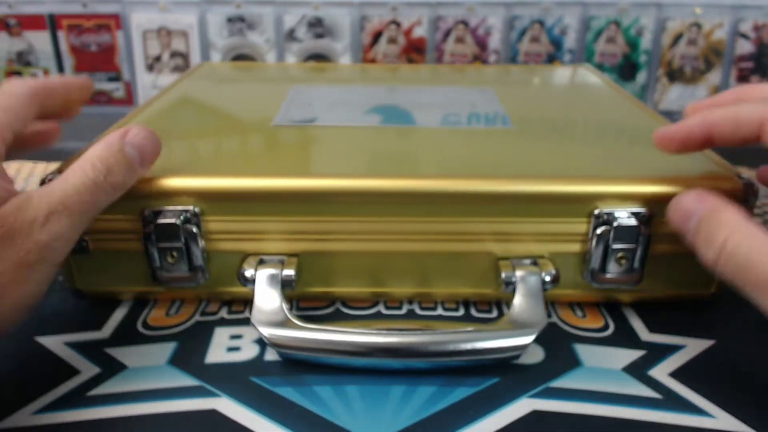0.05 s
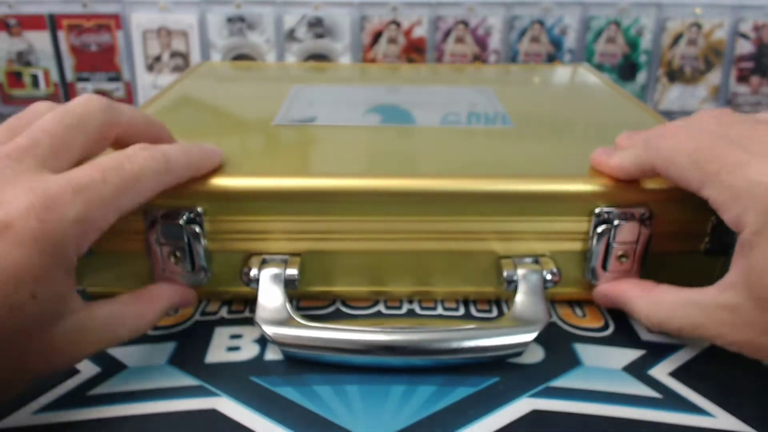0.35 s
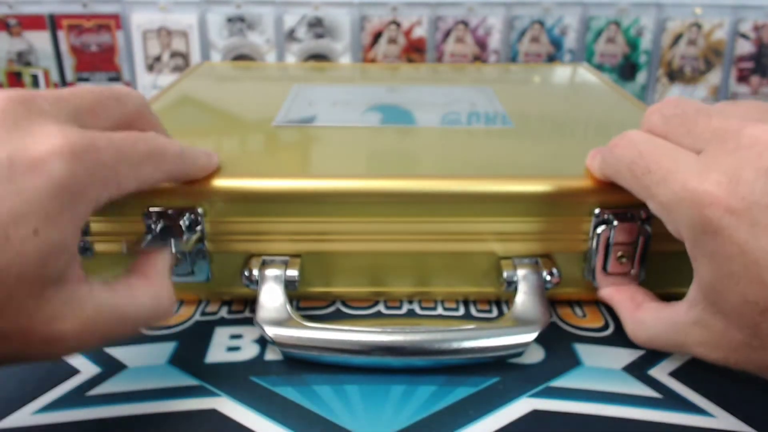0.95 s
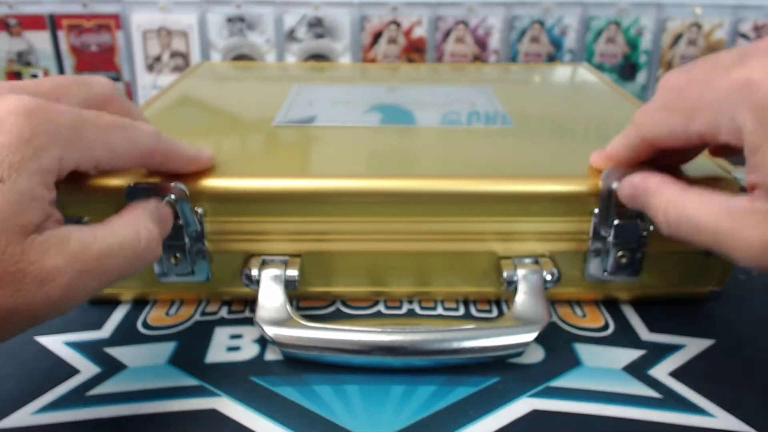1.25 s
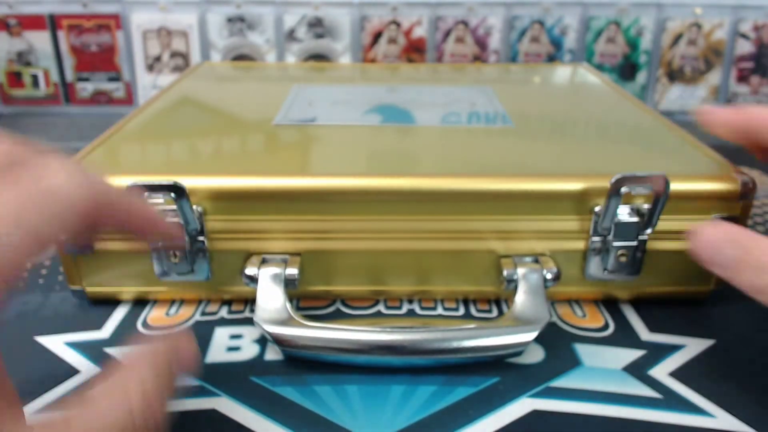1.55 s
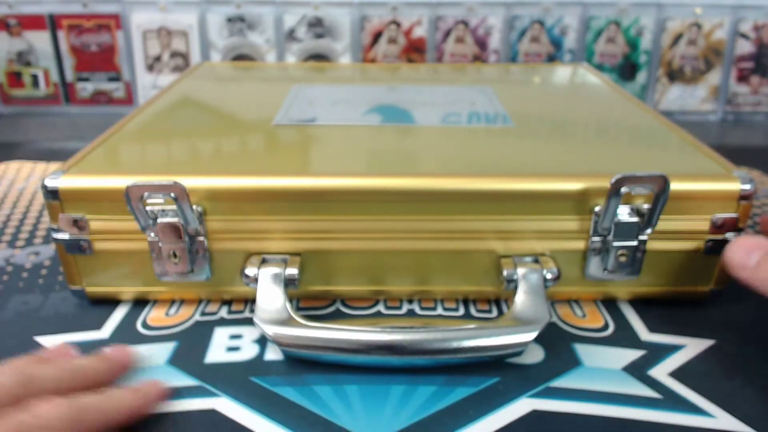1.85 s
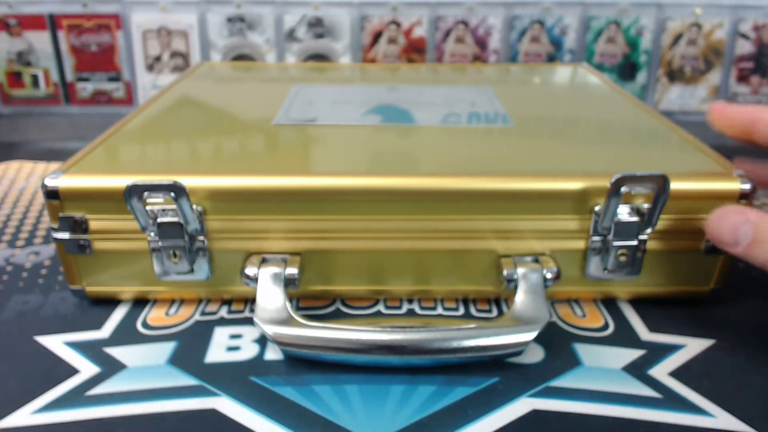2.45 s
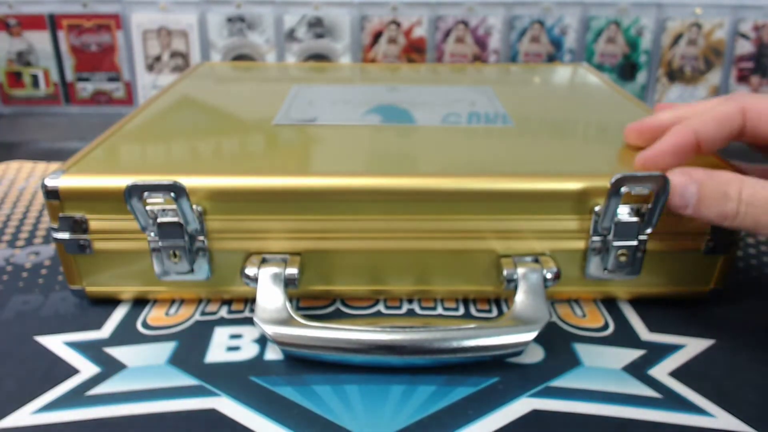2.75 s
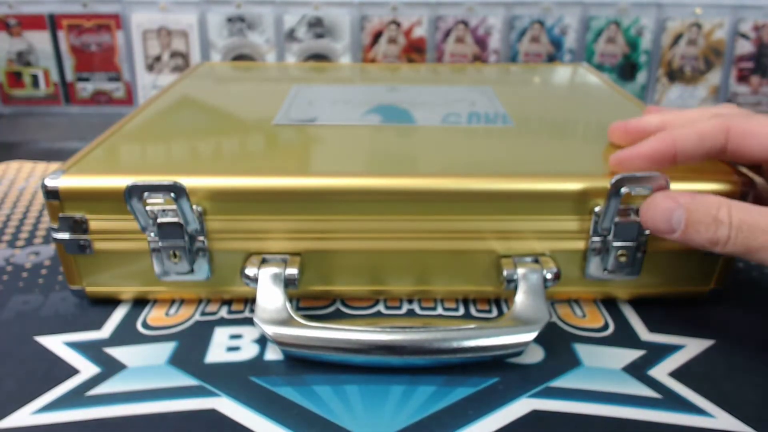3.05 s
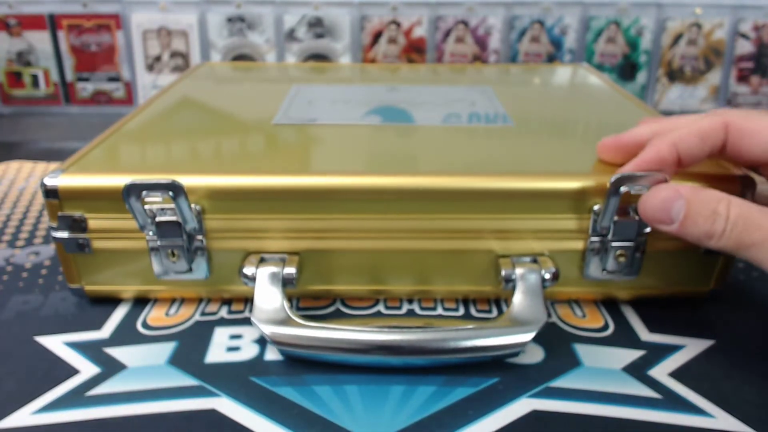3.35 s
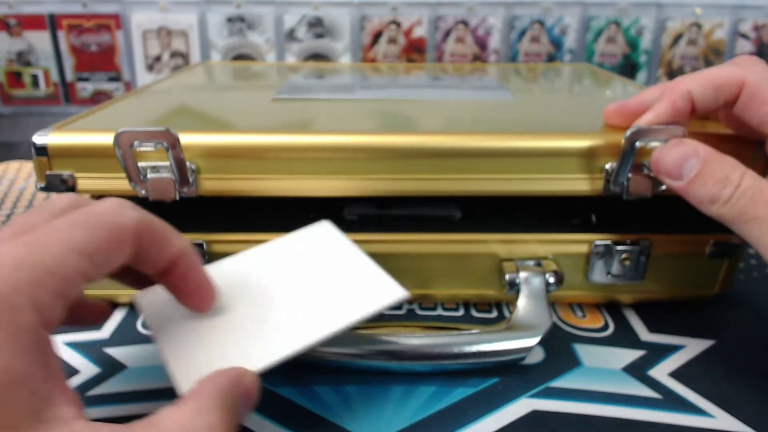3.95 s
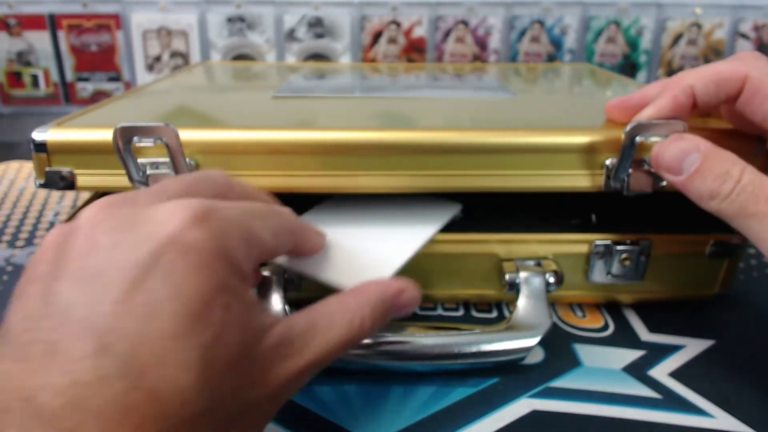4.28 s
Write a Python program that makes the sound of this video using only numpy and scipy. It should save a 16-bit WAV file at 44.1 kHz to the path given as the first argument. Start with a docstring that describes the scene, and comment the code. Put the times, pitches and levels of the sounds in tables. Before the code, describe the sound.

Hands unfasten a small aluminium case with light clicks and hollow knocks, lift the lid and slip in a softly rasping card.

```python
"""Hands brush over a small aluminium case and bump the padded desk, which sways under it.
Two steel latches are thumbed open close by: each hasp judders by stick and slip, then lets go,
and the impacts excite the damped modes of the steel, the panels and the hollow shell.
After more brushing the lid scrapes free of its rim, and last a card rasps in at the opening.
Throughout, the walls of a small, quiet room reflect the sound over faint air noise and hum."""
import sys
import numpy as np
from scipy import signal
from scipy.fft import rfft, irfft, next_fast_len
from scipy.io import wavfile
from scipy.ndimage import uniform_filter1d

SR = 44100
rng = np.random.default_rng(int(sys.argv[2]) if len(sys.argv) > 2 else 0)


def persist_wave(psi):
    """Save psi, clipped to +-1, as 16-bit WAV."""
    counts = np.round(np.clip(psi, -1, 1) * 32767).astype(np.int16)
    wavfile.write(sys.argv[1], SR, np.atleast_2d(counts).T)


N = 190240
TIME = np.arange(N) / SR
AGE = TIME[:8192]  # time since an impact, t/s


# Timbre by struck part: shell f/Hz, favoured panel f/Hz, click low f/Hz, click high f/Hz,
# favoured steel f/Hz, then resonance level/dB, ring level/dB, edge level/dB relative to the click
PARTS = {'wall': (199, 1256, 1998, 7400, 2301, -12, -5, -9.5),
         'first latch': (253, 1350, 1698, 7397, 2502, -8, -11, -30),
         'second latch': (211, 848, 2098, 7600, 3503, -4.5, -10, -18.5),
         'loose hasp': (210, 1257, 3785, 7605, 6792, -3, -11, -9),
         'hasp spring': (218, 620, 2000, 7400, 7000, -8, -12, 4),
         'rim': (308, 689, 2000, 7400, 2403, -5, 1, -11), 'lid': (297, 651, 2000, 7400, 2354, 11, 9, -29),
         'panel': (275.5, 651, 2000, 7400, 5189, -4, -13, -14),
         'frame': (263, 1206, 1004, 3000, 2298, 3, -9, -30),
         'fingertip': (216, 714, 452, 1702, 1294, 5, -19, -24),
         'card': (349, 1248, 1500, 7400, 6700, 0, -14, -17)}
# Impacts on the case: t/s, part, steel level/dB, panel level/dB, shell level/dB
IMPACTS = [(.094, 'wall', -64, -69, -53.5), (.1647, 'wall', -53, -59.5, -54),
           (0.1762, 'wall', -68, -63, -51), (.203, 'wall', -80, -77, -54.5),
           (0.335, 'panel', -68, -63.5, -70), (.369, 'panel', -58.5, -59.5, -84),
           (.742, 'second latch', -62, -61, -66), (.771, 'first latch', -43, -49, -48.5),
           (0.801, 'first latch', -62, -55.5, -58.5), (0.8069, 'first latch', -54, -53, -44.5),
           (.919, 'first latch', -71, -68, -58), (0.9444, 'panel', -59, -54, -48.5),
           (1.0023, 'second latch', -50.5, -52, -61), (1.0136, 'second latch', -52, -59, -46),
           (1.019, 'panel', -57, -51.5, -44.5), (1.0517, 'second latch', -43, -48.5, -39.5),
           (1.1125, 'second latch', -59, -59, -58), (1.127, 'second latch', -63, -62, -65),
           (1.1702, 'second latch', -51, -56, -76), (1.178, 'second latch', -53, -55.5, -43.5),
           (1.203, 'second latch', -62, -62.5, -68), (1.288, 'second latch', -72, -67, -64.5),
           (1.314, 'loose hasp', -66, -68, -61.5), (1.393, 'wall', -64.5, -75, -71),
           (1.416, 'hasp spring', -77, -89, -81), (1.445, 'fingertip', -67, -61.5, -63.5),
           (1.5396, 'second latch', -51.5, -73, -57), (1.5434, 'loose hasp', -50.5, -72, -58),
           (1.557, 'fingertip', -76, -71, -51.5), (1.6479, 'frame', -61.5, -62.5, -67),
           (1.659, 'frame', -64.5, -65, -66), (2.085, 'hasp spring', -70, -89, -98),
           (2.412, 'fingertip', -68, -64.5, -78), (2.64, 'fingertip', -72, -66, -68),
           (3.18, 'loose hasp', -68, -82, -81), (3.339, 'loose hasp', -45, -59, -71),
           (3.3483, 'second latch', -54, -74, -74), (3.48, 'loose hasp', -54.5, -70, -93),
           (3.637, 'rim', -50.5, -65, -78), (3.6489, 'rim', -56.5, -61, -66), (3.652, 'rim', -60, -70, -73),
           (3.6598, 'panel', -62, -59, -71), (3.7183, 'lid', -53.5, -58.5, -56),
           (3.7235, 'panel', -65, -64, -48), (3.7326, 'panel', -57, -57.5, -64),
           (4.1186, 'card', -59, -65, -61), (4.1274, 'card', -58, -61, -62),
           (4.2224, 'frame', -57, -60, -70), (4.2627, 'card', -52, -56, -63.5)]
def latches():
    """Impact excitation: each contact of latch, lid or case drives steel, panels and shell at once."""
    out = np.zeros(N)
    rebound_s, rebound_db = 0.0027, -18  # the steel bounces once
    for t, part, steel_db, panel_db, shell_db in IMPACTS:
        shell_hz, panel_hz, low_hz, high_hz, *steel_timbre = PARTS[part]
        steel = undb(steel_db) * steel_click(part, low_hz, high_hz, *steel_timbre)
        panel = undb(panel_db) * panel_ring(panel_hz)
        shell = undb(shell_db) * shell_knock(shell_hz)
        add(out, t, steel + panel + shell)
        rebound = crack(low_hz, high_hz, t60=0.016, rise_s=0.0011)
        add(out, t + rebound_s, undb(steel_db + rebound_db) * rebound)
    return out


# Modes of the steel hasps and catches: f/Hz, relative level/dB, T60/s
STEEL_MODES = [(2570, -3, 0.024), (3530, -4, 0.02), (4340, -8, 0.013), (4780, -9, 0.018),
               (5460, -3, 0.0065), (6630, 1, 0.0083), (8300, -12, 0.0057)]
# Modes of the lid's rim: f/Hz, relative level/dB, T60/s
RIM_MODES = [(2410, 3, 0.03), (3500, -7, 0.028), (5800, -16, 0.012), (7300, 0, 0.012), (9140, 1, 0.013)]
def steel_click(part, low_hz, high_hz, spot_hz, resonance_db, ring_db, edge_db):
    """A short contact has a wide spectrum: a crack, a broad resonance, ringing metal and a high tick."""
    modes = RIM_MODES if part in ('rim', 'lid') else STEEL_MODES
    click = crack(low_hz, high_hz, t60=0.027, rise_s=0.000077)
    click += undb(resonance_db) * crack(spot_hz / 1.094, spot_hz * 1.075, t60=0.012, rise_s=0.000075)
    click += undb(ring_db) * ring(modes, spot_hz, spot_db=3, detune=0.012)
    edge = crack(9300, 13600, t60=0.016, rise_s=0.0001)
    return click / np.abs(click).max() + undb(edge_db) * edge


# Modes of the aluminium panels: f/Hz, relative level/dB, T60/s
PANEL_MODES = [(460, -1.5, 0.034), (546, 0.5, 0.055), (668, 2, 0.03), (806, -1, 0.031), (870, -6.5, 0.025),
               (991, 0, 0.034), (1210, -2, 0.025), (1368, -5, 0.022), (1450, 1.5, 0.016), (1800, -7, 0.033)]
def panel_ring(spot_hz):
    """Free vibration of plates: the struck panels ring in their bending modes over a midrange crack."""
    bending = ring(PANEL_MODES, spot_hz, spot_db=5.5, detune=0.0035)
    return unit_peak(bending + undb(-7.5) * crack(590, 1410, t60=0.025, rise_s=0.00017))


def shell_knock(hz):
    """Damped resonance of the hollow shell: the knock dies fast and a faint boom lingers."""
    decay = fade(t60=0.04) + undb(-20.5) * fade(t60=0.14)
    attack = 1 - np.exp(-AGE / 0.002)
    tone = np.sin(2 * np.pi * hz * AGE) * decay * attack
    return unit_peak(tone + undb(-17) * crack(209, 490, t60=0.034, rise_s=0.00042))


# Judders of a hasp over its catch: start t/s, duration/s, f/Hz, level/dB
SQUEAKS = [(0.733, 0.0049, 620, -59.5), (0.7676, 0.0045, 870, -47.5), (0.8, 0.0089, 847, -56.5),
           (0.989, 0.015, 965, -54.5), (1.041, 0.0088, 981, -50), (1.169, 0.0122, 976, -49.5)]
def squeaks():
    """Stick-slip oscillation: an uneven tone grows on a panel resonance and dies once the hasp is free."""
    out = np.zeros(N)
    for start, length, hz, db in SQUEAKS:
        grip = np.minimum(AGE / length, 1) * np.exp(-np.maximum(AGE - length, 0) / 0.0019)
        uneven = 1 + 0.13 * walk(700)[:len(AGE)]
        phase = 2 * np.pi * np.cumsum(hz * uneven) / SR
        tone = np.sin(phase) + undb(-22) * np.sin(2 * phase)
        add(out, start, undb(db) * unit_peak(grip * tone))
    return out


# Modes of desk and case under a soft blow: f/Hz, relative level/dB, T60/s
DESK_MODES = [(71, -2, .12), (104, 0, 0.08), (205, -12, 0.06)]
# Soft blows of the hands: t/s, sway f/Hz, sway level/dB, thud level/dB, rocking level/dB
THUDS = [(0.139, 38.8, -40.5, -52.5, -54), (1.214, 40.4, -42, -72, -63), (1.511, 37.1, -55, -46.5, -64),
         (1.566, 36.1, -32, -41, -29), (1.624, 30.2, -55, -50.5, -59), (3.694, 42.5, -48.5, -55, -55)]
def thuds():
    """A soft contact excites only low modes: the desk sways, then thuds and rocks as the hand settles."""
    out = np.zeros(N)
    settle_s = 0.03227
    thud = sum(undb(db) * swing(hz, t60) for hz, db, t60 in DESK_MODES)
    for t, sway_hz, sway_db, thud_db, rock_db in THUDS:
        add(out, t, undb(sway_db) * swing(sway_hz, t60=0.27))
        add(out, t + settle_s, undb(thud_db) * thud + undb(rock_db) * swing(hz=17.5, t60=1.0))
    return out


# Envelope of the card's pushes: t/s, level/dB
CARD_PUSHES = [(4.125, -65), (4.19, -64.5), (4.217, -68), (4.226, -61.5), (4.256, -62), (4.263, -60.5),
               (4.288, -58.5), (4.31, -64.5)]
# Spectrum of its rasp: f/Hz, relative level/dB
CARD_SPECTRUM = [(150, -28), (330, -11), (600, -9), (950, -3), (1350, -0.5), (2300, -3.5), (4400, -6.5),
                 (8000, -9.5), (15500, -18)]
# Its resonances: f/Hz, bandwidth/Hz, relative level/dB, strongest at t/s
CARD_RESONANCES = [(3130, 300, 1, 4.18), (5240, 320, 11, 4.135), (6900, 390, 10, 4.125),
                   (1322, 160, 10, 4.237), (2210, 330, 11, 4.285), (3600, 210, 15, 4.297),
                   (4480, 180, 10, 4.242), (5570, 150, 7, 4.255), (6230, 140, 6, 4.28),
                   (7700, 200, 8, 4.28)]
def card():
    """Friction drives the card's resonances, which swell and fade in turn as its free length changes."""
    start_s, attack_s, swell_s = 4.115, 0.023, 0.034
    slips = friction(grain_db=4) * undb(3 * walk(450))
    resonances = 0
    for hz, width, db, strongest_s in CARD_RESONANCES:
        flexed_time = TIME + 0.0001 * walk(30)  # a wandering delay makes the pitch waver
        resonance = np.interp(flexed_time, TIME, band(slips, hz - width / 2, hz + width / 2))
        prominence = np.exp(-((TIME - strongest_s) / swell_s) ** 2)
        resonances += undb(db) * prominence * resonance
    echo_time = TIME - 0.00127 + 0.00005 * walk(20)  # reflection in the gap under the lid
    echo = undb(-18) * np.interp(echo_time, TIME, slips)
    rasp = colour(slips + resonances + echo, CARD_SPECTRUM)
    rasp /= np.sqrt(uniform_filter1d(rasp ** 2, size=2048))  # running rms held at 1
    pushes = undb(np.interp(TIME, *np.transpose(CARD_PUSHES)))
    return rasp * pushes * np.clip((TIME - start_s) / attack_s, 0, 1)


# Rough drags of the hands and of the lid on its rim: start t/s, duration/s, level/dB, centre f/Hz
DRAGS = [(1.265, 0.03, -86, 2860), (1.367, 0.038, -81, 2900), (1.84, 0.043, -72, 520),
         (1.859, 0.11, -69, 1460), (2.075, 0.16, -89.5, 5940), (2.28, 0.046, -84, 4300),
         (2.287, 0.29, -81, 1040), (2.627, 0.077, -78, 1830), (3.611, 0.039, -76, 2360),
         (3.691, 0.028, -75, 2300)]
def drags():
    """Rough friction: firm rubbing catches and slips in one band, along with a fine hiss."""
    slips = friction(grain_db=8) * undb(2 * walk(110))
    hiss = undb(-6.5) * unit(band(slips, 2680, 8100))
    out = 0
    for start, length, db, hz in DRAGS:
        rub = unit(band(slips, hz / 1.51, hz * 1.31))
        out += undb(db) * swell(start, length) * (rub + hiss)
    return out


# Spectrum of sliding skin: f/Hz, relative level/dB
SKIN_SPECTRUM = [(700, -51), (1500, -6), (3000, -1.5), (6300, 3), (10500, 5.5), (13000, 5.5), (15500, 1)]
# Strokes over case and mat: start t/s, duration/s, level/dB, tilt/(dB per octave)
STROKES = [(0.025, 0.45, -73, -1.5), (1.327, 0.077, -87, -3), (1.534, 0.17, -79, -6), (1.685, 0.2, -75, -5),
           (1.821, 0.22, -72.5, -5.5), (2.043, 0.17, -80.5, -6), (2.258, 0.23, -80.5, -3),
           (2.554, 0.29, -80.5, -4.5), (3.07, 0.16, -81.5, -7)]
def hands():
    """Sliding friction: skin hisses over smooth surfaces, each stroke with its own spectral tilt."""
    hz, db = np.transpose(SKIN_SPECTRUM)
    slips = friction(grain_db=3.5) * undb(walk(35))
    out = 0
    for start, length, level_db, tilt in STROKES:
        hiss = unit(colour(slips, np.c_[hz, db + tilt * np.log2(hz)]))
        out += undb(level_db) * swell(start, length) * hiss
    return out


def room(x, t60, treble_t60):
    """Reverberation: close walls answer within milliseconds, and absorption takes the treble first."""
    low, high = rng.standard_normal((2, len(AGE)))
    tail = band(low, 280, 5200) * fade(t60) + undb(-0.5) * band(high, 3900, 18000) * fade(treble_t60)
    tail *= np.clip(AGE / 0.0037 - 0.5, 0, 1)
    return signal.fftconvolve(x, tail / np.linalg.norm(tail))[:N]


# Spectrum of the room air: f/Hz, relative level/dB
AIR_SPECTRUM = [(30, -19.5), (60, -24.5), (120, -2.5), (220, -2.5), (400, -6), (800, -13.5), (1300, -17),
                (2500, -27), (5000, -35.5), (10000, -38.5), (15500, -41.5)]
# Hum of an appliance: f/Hz, level/dB
HUM = [(120, -81), (199, -78)]
# Spectrum of the desk's tremble: f/Hz, relative level/dB
TREMBLE_SPECTRUM = [(6, -23.5), (14, 11.5), (22, -5.5), (41, -2), (55, -15.5), (100, -24), (200, -43.5),
                    (2000, -130)]
# Hands leaning on the case: start t/s, duration/s, level/dB
LEANS = [(0, 0.59, -50), (0.94, 0.36, -52), (1.517, 0.38, -54.5), (2.582, 0.15, -79), (3.422, 0.54, -58)]
def background():
    """Ambient noise: air, hum and the forced vibration of the desk, stronger while hands lean on it."""
    air_db, resting_desk_db = -71, -56.5
    air = unit(colour(rng.standard_normal(N), AIR_SPECTRUM)) * undb(air_db + 0.3 * walk(1.7))
    hum = sum(undb(db) * unit(np.sin(2 * np.pi * hz * TIME)) for hz, db in HUM)
    tremble = unit(colour(rng.standard_normal(N), TREMBLE_SPECTRUM))
    leaning = sum(undb(db) * swell(start, length) for start, length, db in LEANS)
    return air + hum + tremble * (undb(resting_desk_db) + leaning)


def ring(modes, spot_hz, spot_db, detune, scatter_db=2):
    """Modal superposition: the struck spot favours modes near spot_hz, and the grip detunes them."""
    out = 0
    for (hz, db, t60), (size, shift, sign) in zip(modes, rng.standard_normal((len(modes), 3))):
        near = np.exp(-(np.log(hz / spot_hz) / 0.28) ** 2)
        wave = np.sin(2 * np.pi * hz * (1 + detune * shift) * AGE)
        out += np.sign(sign) * undb(db + spot_db * near + scatter_db * size) * fade(t60) * wave
    return unit_peak(out)


def crack(lo_hz, hi_hz, t60, rise_s):
    """Contact noise: hard parts chatter in a brief burst, whitened so it has no pitch, then band-passed."""
    contact = fade(t60) * (1 - np.exp(-AGE / rise_s))
    spectrum = rfft(rng.standard_normal(len(AGE)) * contact)
    whitened = irfft(spectrum / np.abs(spectrum))
    return unit_peak(band(whitened * fade(t60) ** 0.25, lo_hz, hi_hz))


def swing(hz, t60):
    """Damped oscillator: a soft push takes about a cycle to set it swinging."""
    age = TIME[:SR]
    onset = 1 - np.exp(-(age * hz / 0.5) ** 2)
    return unit_peak(np.sin(2 * np.pi * hz * age) * fade(t60, age) * onset)


def friction(grain_db):
    """Friction noise: countless tiny slips of log-normal size."""
    size, slip = rng.standard_normal((2, N))
    return unit(undb(grain_db * size) * slip)


def swell(start, length):
    """Parabolic envelope: a stroke speeds up, then slows to rest."""
    along = np.clip((TIME - start) / length, 0, 1)
    return 4 * along * (1 - along)


def fade(t60, age=AGE):
    """Exponential decay, 60 dB down after t60."""
    return np.exp(-np.log(1000) * age / max(t60, 1e-3))


def walk(rate_hz):
    """Random modulation, interpolated, of spread near 1."""
    knots = rng.standard_normal(N // 10)
    return np.interp(TIME * rate_hz, np.arange(len(knots)), knots)


def colour(x, points):
    """Spectral shaping by (f/Hz, level/dB) points."""
    hz, db = np.transpose(points)
    size = next_fast_len(len(x))
    f = np.fft.rfftfreq(size, 1 / SR)
    gain = undb(np.interp(np.log(f + 1), np.log(hz), db))
    return irfft(rfft(x, size) * gain, size)[:len(x)]


def band(x, lo_hz, hi_hz):
    """Causal band-pass."""
    return signal.sosfilt(signal.butter(2, [lo_hz, hi_hz], 'band', fs=SR, output='sos'), x)


def undb(db):
    """Level to amplitude ratio."""
    return 10 ** (np.asarray(db) / 20)


def unit(x):
    """Normalise to rms 1."""
    return x / np.std(x)


def unit_peak(x):
    """Normalise the loudest two milliseconds to rms 1."""
    return x / np.sqrt(uniform_filter1d(x ** 2, size=88).max())


def add(out, start_s, x):
    """Superpose x on out from start_s."""
    i = int(start_s * SR)
    out[i:i + len(x)] += x[:N - i]


def scene():
    """Superposition of direct and reflected sound; the case's far sides ring differently into the room."""
    rubbing = squeaks() + hands() + drags() + card()
    far_sides = latches()
    walls = undb(-10) * room(far_sides + rubbing, t60=0.21, treble_t60=0.17)
    return (latches() + rubbing + walls + thuds() + background())[None]


def record(dry):
    """Band limiting: a steep low-pass removes the highest treble."""
    cutoff_hz = 15850
    return signal.sosfilt(signal.ellip(10, 0.2, 70, cutoff_hz, fs=SR, output='sos'), dry)


dry = scene()
out = record(dry)
persist_wave(out)
```